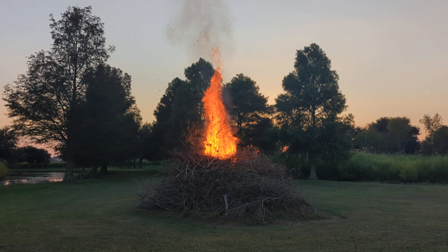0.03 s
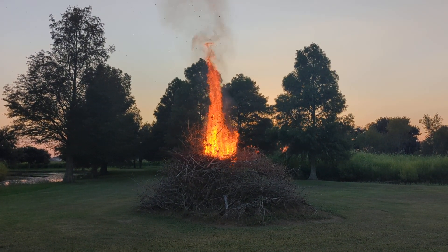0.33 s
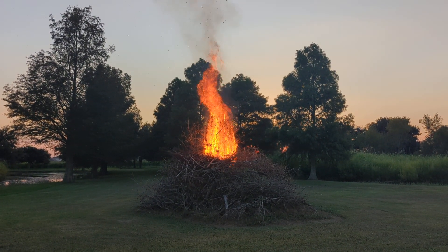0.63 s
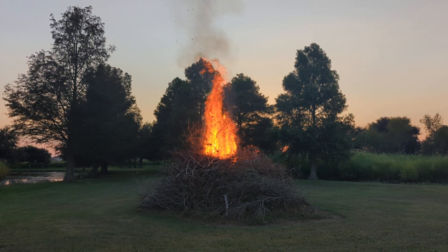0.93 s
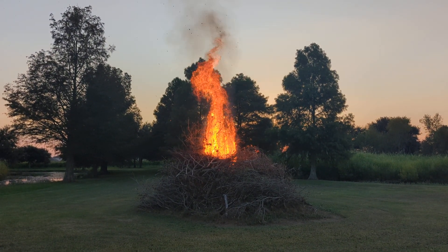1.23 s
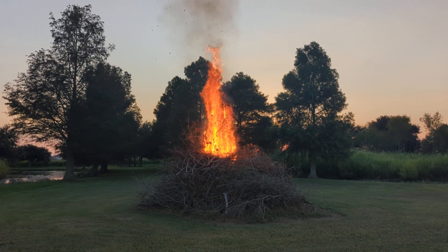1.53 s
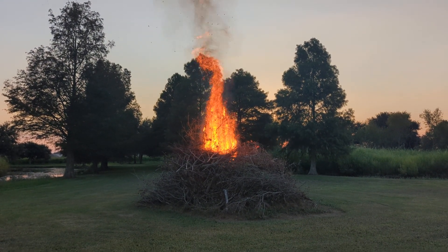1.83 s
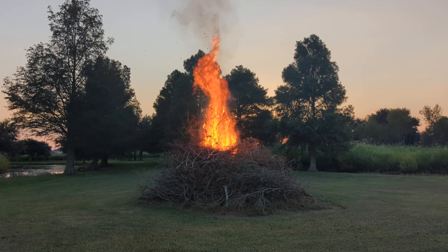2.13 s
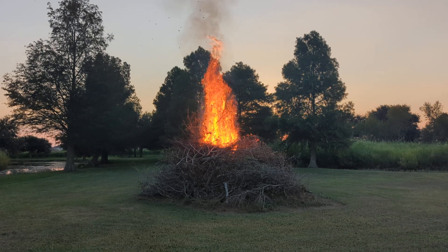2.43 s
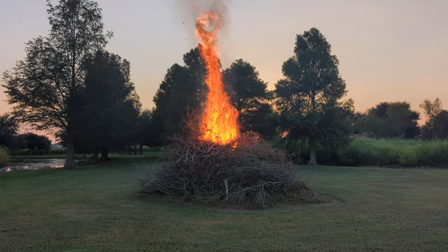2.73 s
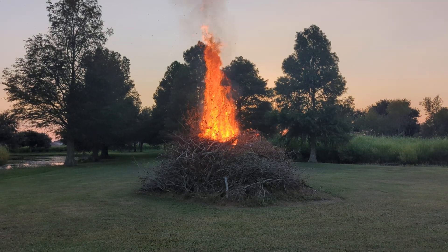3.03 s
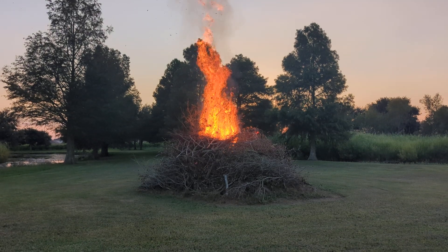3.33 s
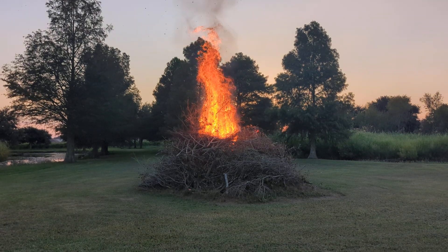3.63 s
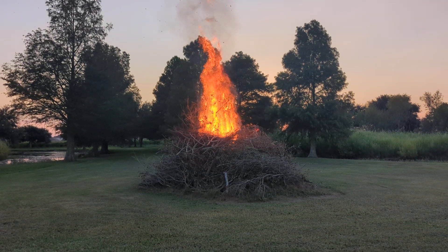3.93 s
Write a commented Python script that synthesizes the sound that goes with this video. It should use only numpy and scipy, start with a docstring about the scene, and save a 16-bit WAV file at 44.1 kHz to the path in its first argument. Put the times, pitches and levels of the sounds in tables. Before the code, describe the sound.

A bonfire of branches crackles and pops over a low rumble, with faint insects.

```python
"""A big pile of branches burns on a lawn on a still evening.
Pockets of sap burst as sharp pops over a dense crackle, both scattered by the twigs.
Buried bursts thud, drying wood hisses, steam whistles once from a branch and the flames rumble.
Insects shrill faintly in the grass and something hums far off."""
import sys
import numpy as np
from scipy import signal
from scipy.fft import rfft, irfft, next_fast_len
from scipy.io import wavfile

SR = 44100
rng = np.random.default_rng(int(sys.argv[2]) if len(sys.argv) > 2 else 0)


def log_audio(samples):
    """Write samples as a 16-bit WAV file to the path given in sys.argv[1]."""
    # one column per channel
    frames = np.atleast_2d(samples).T
    # limit to full scale, then quantise
    limited = np.clip(frames, -1, 1)
    pcm = np.round(limited * 32767).astype(np.int16)
    wavfile.write(sys.argv[1], SR, pcm)


N = 176400
TIME = np.arange(N) / SR


def pops(snap_hz=4600, gain_db=1.5):
    """Each bursting sap pocket gives one pressure pulse: a short wood knock and a bright snap."""
    # Each row: start in seconds, knock gain in dB, knock pitch in Hz, knock Q, snap gain in dB,
    # twig scatter in dB re the direct sound.
    sap_bursts = [(0.0444, -5, 3500, 0.81, -0.5, 0), (0.056, 0, 2120, 2, -29, -19),
                  (0.1857, -2.5, 2330, 1.4, -16, -18), (0.2136, -29, 2130, 2.5, -7.5, -18),
                  (0.2187, -27, 2360, 0.9, -10, -12), (0.2774, -23, 2710, 0.8, -22, -14),
                  (0.3067, -5.5, 2700, 0.85, -11, -7), (0.48, -5.5, 3000, 0.47, -11, -2),
                  (0.4864, -6, 3120, 0.68, -7, -3), (0.5394, 6.5, 3900, 1.6, -18, -4.5),
                  (0.5429, 2.5, 2390, 1.3, -5, -4), (0.5739, 1, 2250, 1.7, -8, -3),
                  (0.6243, -11, 1900, 1.8, -9, 2), (0.658, -8, 2050, 0.85, -17, 6.5),
                  (0.664, -18, 2470, 1.1, -15, -10), (0.7057, 1, 2510, 1.6, -13, -7),
                  (0.7616, -3, 2070, 0.67, -18, -13), (0.8055, -7.5, 3620, 0.74, -11, 7),
                  (1.0072, -8, 2140, 1.6, -12, 5), (1.0328, 11.5, 4160, 0.58, 13.5, -7.5),
                  (1.1567, -24, 9900, 0.5, -28, -7), (1.1656, -7.5, 3050, 0.32, -18, -11),
                  (1.1825, 14.5, 2610, 2.35, -4.5, -7), (1.234, 1.5, 2820, 2.5, -1.5, -5),
                  (1.264, -11, 2520, 1.9, -4, 0), (1.3312, -9.5, 3100, 0.9, -10.5, 5.5),
                  (1.384, -2.5, 2270, 1.3, -18, -4), (1.466, -5, 3400, 0.78, -6, -10),
                  (1.5637, -2, 1910, 1.2, -11.5, -4), (1.5978, -2.5, 2440, 0.6, -18, -10),
                  (1.6528, -2, 2510, 1.3, -17, 8), (1.6782, -10, 4000, 0.7, -7, -2),
                  (1.7922, -1, 3060, 1.06, -17, -14), (1.9373, -21, 1720, 0.9, -12, -14),
                  (1.9509, -3.5, 2650, 0.74, -3.5, -3), (1.9618, 2, 2100, 1.4, -4, -9),
                  (2.0492, 2.5, 3580, 0.71, -28, -9), (2.0617, -6.5, 9350, 1.6, -18, -4),
                  (2.0723, -9, 2910, 0.5, -8, -1), (2.1115, -13, 2940, 1.2, -20, -14),
                  (2.1716, -5, 3180, 0.78, -12, -2), (2.2523, 3, 2850, 0.46, -1, -10),
                  (2.3625, 7, 2820, 1.36, -3.5, -10), (2.4667, -2, 2130, 2.6, -11, -8),
                  (2.4737, -3.5, 5300, 0.4, -18, -2.5), (2.487, -7, 2300, 2.4, -12, 7),
                  (2.549, -7, 5060, 0.43, -5, -0.5), (2.6201, -3, 2200, 0.85, -12, -1),
                  (2.6381, 1.5, 2480, 1.25, -16, -2), (2.6416, -7.5, 1930, 1.9, -7.5, 5),
                  (2.6966, 6, 2850, 0.89, -38, -12), (2.9395, -5, 3070, 0.69, -8, -16),
                  (3.0315, 2, 2240, 1.5, -6.5, -5), (3.1921, 9, 2550, 0.87, -41, -5.5),
                  (3.2193, 0.5, 3270, 0.5, -1, -6), (3.4195, -3, 2560, 4.2, -8, 0),
                  (3.4772, 0, 2250, 0.82, -8, -3), (3.601, -7, 2550, 1.5, -13, -4),
                  (3.7298, -4.5, 3030, 0.95, -13, 6), (3.7671, -8, 2380, 0.38, -7, -4),
                  (3.812, -4, 3000, 1.0, -2, -1), (3.8223, -4, 2980, 1.9, -28, -14),
                  (3.853, -18, 2710, 1.7, -23, -9.5), (3.9038, 0.5, 2480, 0.9, -31, -1.5),
                  (3.9731, -4.5, 1310, 1.4, -4.5, -6), (3.9941, 1.5, 2360, 1.5, -16, -2)]
    out = np.zeros((2, N))
    pulse = signal.unit_impulse(SR // 100)
    snap = signal.lfilter(*signal.butter(2, snap_hz, "high", fs=SR), pulse)
    branch = from_db(-32) * knock(pulse, hz=740, q=0.3)  # faint low answer of the branch
    for start_s, knock_db, hz, q, snap_db, scatter_db in sap_bursts:
        wood = knock(pulse, hz, q) - branch
        burst = from_db(knock_db) * wood + from_db(snap_db) * snap
        add(out, start_s, through_twigs(burst, scatter_db))
    return from_db(gain_db) * out


def crackle(pitches=10, max_size=3.3, pan_spread_db=1):
    """Small bursts of random size and place, thicker when the fire flares."""
    # Each row: base rate per second, base gain in dB, dB added per unit of size,
    # lowest pitch in Hz, highest pitch in Hz, Q.
    bands = [ (203.5, -18.5, 3.5, 2220, 2470, 1.23), (327, -27.5, 3.5, 4700, 12200, 0.63),
             (120, -20, 4.7, 11500, 16000, .85), ]
    out = np.zeros((2, N))
    flare = from_db(2.5 * drift(rate_hz=5.6))
    for per_s, base_db, spread_db, low_hz, high_hz, q in bands:
        for hz in np.geomspace(low_hz, high_hz, pitches):
            onsets = np.flatnonzero(rng.random(N) < per_s / pitches * flare / SR)
            size = np.minimum(rng.exponential(1, N)[onsets], max_size)
            side_db = pan_spread_db * rng.standard_normal(N)[onsets]
            clicks = np.zeros((2, N))
            clicks[:, onsets] = from_db(base_db + spread_db * size) * pan(side_db / 2)
            out += through_twigs(knock(clicks, hz, q), scatter_db=-6)
    return out


def thuds():
    """Bursts buried in the pile come out dull and smeared."""
    # Each row: start in seconds, gain in dB, pitch in Hz, Q.
    buried_bursts = [(0.8583, -1.5, 920, 0.44), (1.5763, 5, 1830, 0.47)]
    out = np.zeros(N)
    for start_s, db, hz, q in buried_bursts:
        smear = dying_noise(t60_s=0.057)[0]
        add(out, start_s, from_db(db) * knock(smear, hz, q))
    return out


def hiss(flicker_db=0.5):
    """Drying wood sizzles with a fast flicker."""
    # Each row: frequency in Hz, noise gain in dB.
    spectrum = [(400, -110), (1000, -86.5), (2400, -80.5), (3600, -84.5), (5200, -90), (8000, -88.5),
                (12000, -83.5), (15000, -82.5)]
    sizzle = shaped(stereo_noise(correlation=0.35), spectrum)
    return sizzle * from_db(flicker_db * drift(rate_hz=140))


def whistle(jitter_hz=17.4, flutter_db=1.0):
    """Steam escapes from a crack, its pitch sinking with the pressure."""
    # Each row: time in seconds, pitch in Hz, level in dB.
    contour = [(2.26, 6790, -76), (2.307, 6690, -47), (2.37, 6630, -75), (2.441, 6540, -45.5),
               (2.559, 6330, -51.5), (2.738, 6190, -52.5), (2.785, 6120, -53), (2.82, 6140, -62),
               (2.98, 6240, -55), (3.04, 6240, -62), (3.16, 6170, -60), (3.28, 6140, -78)]
    times_s, hz, db = np.transpose(contour)
    pitch_hz = np.interp(TIME, times_s, hz) + jitter_hz * drift(rate_hz=53.5)
    level_db = np.interp(TIME, times_s, db, left=-140, right=-140) + flutter_db * drift(rate_hz=33)
    tone = np.sqrt(2) * np.sin(2 * np.pi * np.cumsum(pitch_hz) / SR)
    return from_db(level_db) * tone * pan(left_db=1.5)


def roar(side_db=-16):
    """Low rumble of the rising gas, nearly alike on both sides."""
    # Each row: frequency in Hz, noise gain in dB.
    spectrum = [(20, -100), (30, -104), (50, -73), (70, -68.5), (125, -68.5), (165, -75.5), (200, -77.5),
                (260, -88), (400, -83.5), (620, -80), (820, -90), (1100, -92), (1700, -97), (4000, -112)]
    noise = stereo_noise(correlation=1) + from_db(side_db) * stereo_noise(correlation=0)
    return shaped(noise, spectrum)


def insects():
    """Two far choruses blur into narrow bands; one fades, the other holds nearly steady."""
    # Each row: pitch in Hz, width in Hz, starting level in dB, final level in dB.
    choruses = [(9930, 130, -49, -58), (10220, 380, -52, -52.5)]
    out = np.zeros((2, N))
    for hz, width_hz, start_db, end_db in choruses:
        shrill = np.array([narrow_noise(hz, width_hz), narrow_noise(hz, width_hz)])
        out += from_db(np.linspace(start_db, end_db, N)) * shrill
    return out * pan(left_db=1)


def hum(level_db=-53.5):
    """A low, wavering tone far off."""
    return from_db(level_db) * narrow_noise(hz=80.5, width_hz=1.54)


def knock(x, hz, q):
    """Heavily damped wood: one broad resonance applied twice."""
    limit_hz = 0.4 * SR  # caps pitch and bandwidth
    hz = min(hz, limit_hz)
    b, a = signal.iirpeak(hz, max(q, hz / limit_hz), fs=SR)
    return signal.lfilter(b, a, signal.lfilter(b, a, x + 1e-18))


def through_twigs(burst, scatter_db):
    """The direct sound, then a short tail from the tangle of twigs."""
    paths = from_db(scatter_db) * dying_noise(t60_s=0.045)
    paths[:, 0] += 1
    return signal.fftconvolve(np.atleast_2d(burst), paths, axes=1)[:, :N]


def across_lawn(fire, trees_db=-18, right_lag_s=28e-6):
    """The trees add a faint tail; the right side hears the fire later and mostly weaker."""
    # Colour of the fire at the listener. Each row: frequency in Hz, gain in dB.
    colour = [(1000, -2.5), (5200, -7.5), (6300, -1), (6850, -4), (7300, -3), (8100, -10.5), (9200, -8),
              (10300, -2.5), (11000, -6), (12100, -5.5), (14100, -12), (15000, -12.5)]
    # Right side against left. Each row: frequency in Hz, gain in dB.
    right_colour = [(700, 4), (1500, -11.5), (2200, -5), (3200, -9), (4200, 1), (6200, -6.5), (7200, -5.5),
                    (8100, -7), (9300, -3), (11500, -2), (15000, -0.5)]
    trees = dying_noise(t60_s=0.95, size=20000)
    tail = from_db(trees_db) * signal.fftconvolve(fire, trees, axes=1)[:, :N]
    left, right = shaped(fire + tail, colour)
    right = shaped(right, right_colour)
    delay = np.exp(-2j * np.pi * np.arange(N // 2 + 1) * SR / N * right_lag_s)
    return np.array([left, irfft(rfft(right) * delay, N)])


def from_db(db):
    """Decibels to gain."""
    return 10 ** (np.asarray(db) / 20)


def pan(left_db):
    """Channel gains: left up by left_db, right down as much."""
    return from_db(left_db * np.array([[1], [-1]]))


def drift(rate_hz):
    """Smooth random wander, standard deviation 1."""
    step, settle = 20, 4000
    pole = np.exp(-2 * np.pi * rate_hz * step / SR)
    noise = rng.standard_normal(N // step + settle + 2)
    slow = signal.lfilter([1], [1, -2 * pole, pole * pole], noise)[settle:]
    return np.interp(np.arange(N) / step, np.arange(len(slow)), slow / slow.std())


def shaped(x, points):
    """Minimum-phase filter through (Hz, dB) points."""
    size = 2 * next_fast_len(N)
    hz, db = np.transpose(points)
    bins_hz = np.arange(size // 2 + 1) * SR / size
    curve_db = np.interp(np.log(bins_hz + 1), np.log(hz), db)
    cepstrum = irfft(curve_db * np.log(10) / 20)
    cepstrum[1:size // 2] *= 2  # fold onto positive time
    cepstrum[size // 2 + 1:] = 0
    return irfft(rfft(x, size) * np.exp(rfft(cepstrum)))[..., :N]


def stereo_noise(correlation):
    """Stereo white noise, 0 dB per Hz."""
    shared = np.sqrt(correlation) * rng.standard_normal(N)
    separate = np.sqrt(1 - correlation) * rng.standard_normal((2, N))
    return (shared + separate) * np.sqrt(SR / 2)


def narrow_noise(hz, width_hz):
    """A tone of wandering strength and phase, rms 1."""
    phase = 2 * np.pi * hz * TIME
    return drift(width_hz) * np.cos(phase) + drift(width_hz) * np.sin(phase)


def dying_noise(t60_s, size=4096):
    """Decaying stereo noise, energy 1 a side."""
    tail = rng.standard_normal((2, size)) * from_db(-60 * TIME[:size] / t60_s)
    return tail / np.sqrt(np.sum(tail ** 2, axis=1, keepdims=True))


def add(out, start_s, sound):
    """Mix sound into out at start_s."""
    start = int(round(start_s * SR))
    part = sound[..., :max(N - start, 0)]
    out[..., start:start + part.shape[-1]] += part


def scene():
    """The fire, the insects and a far hum."""
    # Vigour of the crackle and hiss. Each row: time in seconds, gain in dB.
    vigour_points = [(0, -1), (.42, -1), (.55, 0), (.8, 1.5), (.93, -2.5), (1.1, 1.9), (1.45, -.5),
                     (1.65, 2.6), (1.88, -2.2), (2.0, 0.7), (2.55, 0.7), (2.85, -1.5), (3.05, 2.8),
                     (3.3, -1.2), (3.55, 0.1), (4.0, 2.5)]
    vigour = from_db(np.interp(TIME, *np.transpose(vigour_points)))
    fire = pops() + thuds() + vigour * (crackle() + hiss())
    far_hum = hum()
    return across_lawn(fire) + roar() + whistle() + insects() + far_hum


def record(dry, ceiling=1.3, cutoff_hz=15900):
    """Soft clipping rounds the tallest peaks; a steep low-pass cuts the top."""
    rounded = ceiling * np.tanh(dry / ceiling)
    lowpass = signal.ellip(10, 0.1, 70, cutoff_hz, fs=SR, output="sos")
    return signal.sosfilt(lowpass, rounded)


dry = scene()
out = record(dry)
log_audio(out)
```